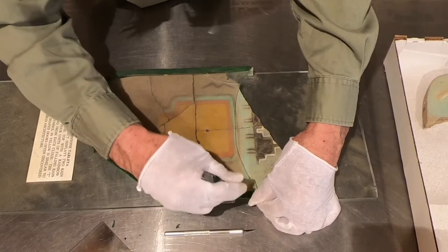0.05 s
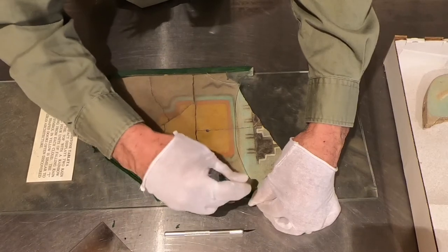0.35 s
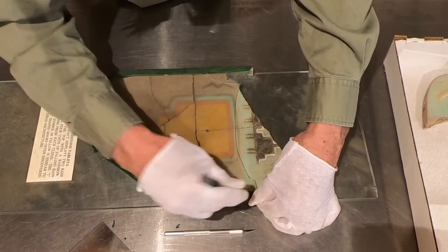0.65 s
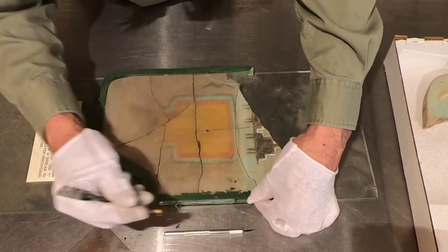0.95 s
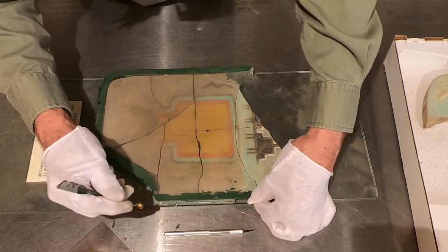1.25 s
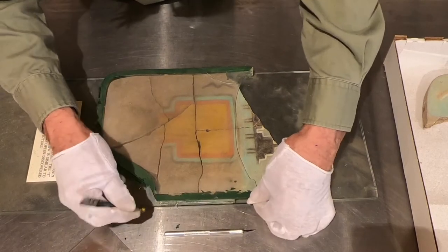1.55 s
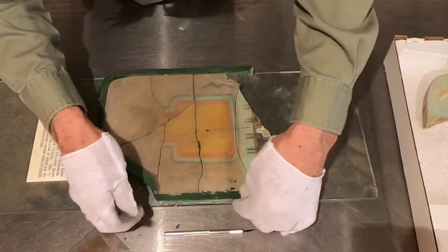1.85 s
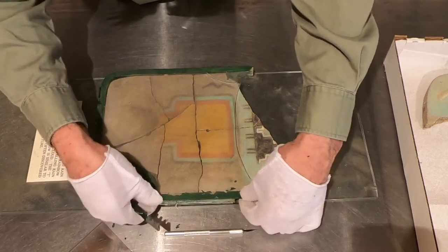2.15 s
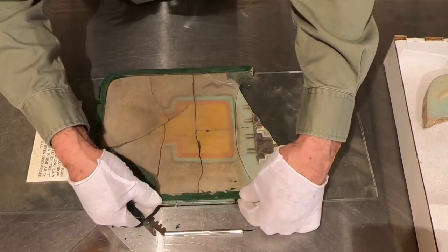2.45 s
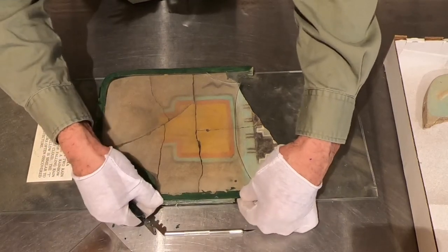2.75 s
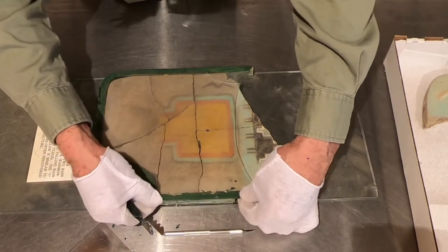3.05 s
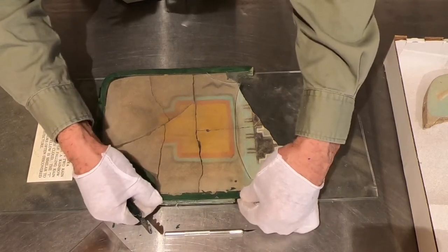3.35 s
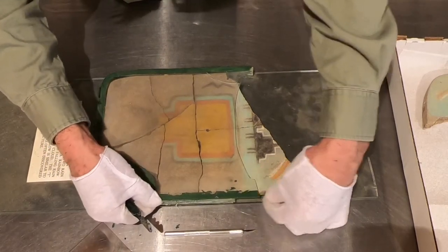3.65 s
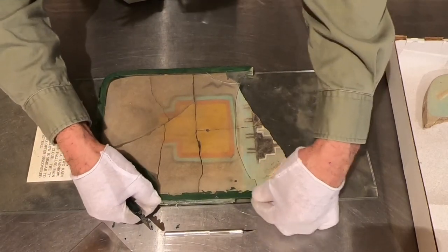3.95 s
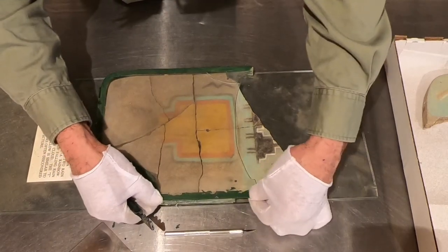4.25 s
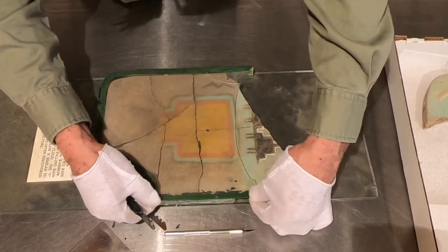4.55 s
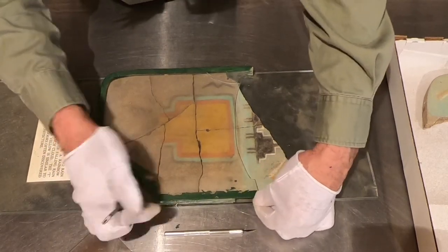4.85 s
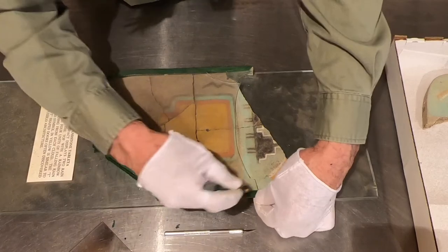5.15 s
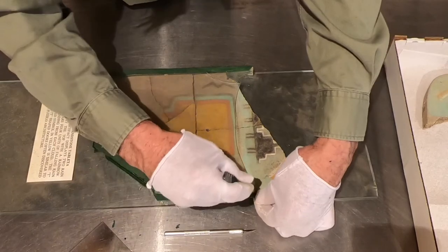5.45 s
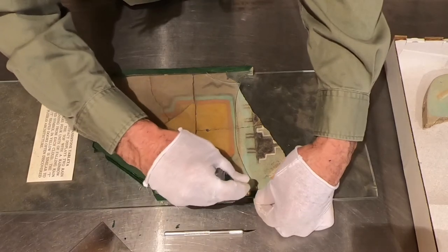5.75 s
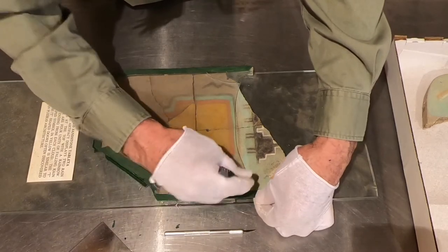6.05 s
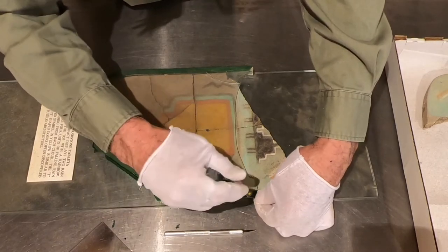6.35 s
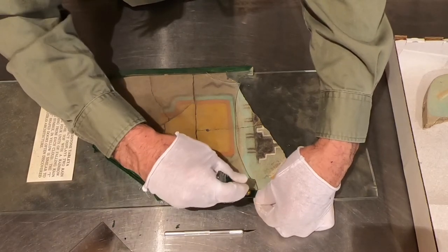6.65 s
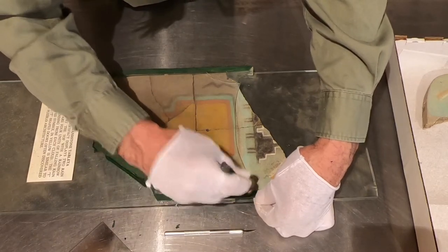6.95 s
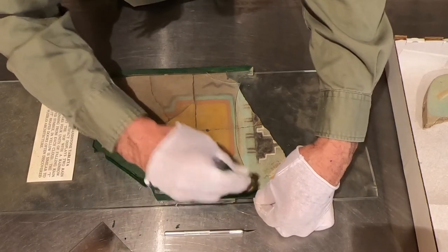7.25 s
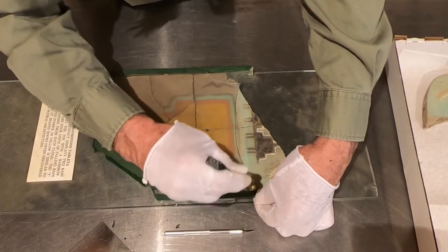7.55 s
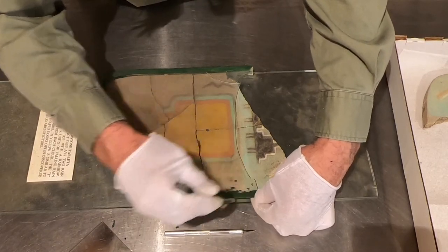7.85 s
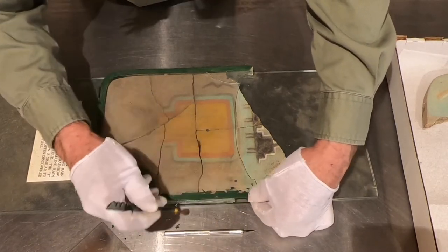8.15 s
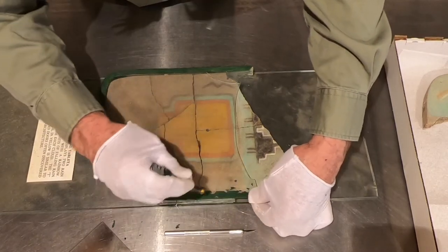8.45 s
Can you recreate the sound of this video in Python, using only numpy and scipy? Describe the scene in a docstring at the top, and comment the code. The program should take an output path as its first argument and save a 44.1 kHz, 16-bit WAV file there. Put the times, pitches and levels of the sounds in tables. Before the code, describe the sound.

Two runs of sharp taps on glass, with light tool scraping and knocking between them, over a faint room hum.

```python
"""In a quiet, hard-walled workroom, a small steel hand tool taps a cracked glass plate on a steel bench.
Each tap is a short glassy crack with a thud, an echo from the walls and a faint, long ring of the bench.
Between two runs of taps the tool scrapes, knocks and slips as a gloved hand shifts it.
Ventilation and mains hum lie underneath, and a limiter turns the hardest taps down."""
import sys
import numpy as np
from scipy import signal
from scipy.fft import rfft, irfft, next_fast_len
from scipy.io import wavfile
from scipy.ndimage import uniform_filter1d, minimum_filter1d

SR = 44100
rng = np.random.default_rng(int(sys.argv[2]) if len(sys.argv) > 2 else 0)


def waveform_to_disk(signal):
    """Save audio, clipped to [-1, 1], as 16-bit WAV at the path in sys.argv[1]."""
    frames = np.transpose(np.atleast_2d(signal))
    scaled = np.clip(frames, -1, 1) * 32767
    samples = np.round(scaled).astype(np.int16)
    wavfile.write(sys.argv[1], SR, samples)


N = 383665


def from_db(db):
    """Turn decibels into a number to multiply a sound by."""
    return 10 ** (np.asarray(db) / 20)


def seconds(length):
    """The time of every sample in a sound this many seconds long."""
    return np.arange(int(length * SR)) / SR


def at_hz(points, hz):
    """Read between the rows of a table, giving every octave equal space."""
    known_hz, values = np.transpose(points)
    return np.interp(np.log(np.maximum(hz, 1)), np.log(known_hz), values)


def keep_only(x, kind, hz, order=2):
    """Keep the "low" or the "high" part of a sound and fade out the rest."""
    return signal.sosfilt(signal.butter(order, hz, kind, fs=SR, output="sos"), x)


def add(out, sound, start_s):
    """Mix a sound in, dropping what falls outside the scene."""
    start = int(round(start_s * SR))
    first, last = np.clip([start, start + sound.shape[-1]], 0, N)
    out[:, first:last] += sound[..., first - start:last - start]


# Sound arriving from all around. Each row: frequency in Hz, how alike left and right are (1 is the same).
LIKENESS = [(100, 0.74), (350, 0.8), (700, 0.4), (1400, 0.2), (2800, .45), (5000, 0.5), (9000, -.1),
            (14000, 0)]
def surrounding_noise(colour, size):
    """The spectrum of stereo noise whose two sides are most alike in the bass."""
    hz = np.fft.rfftfreq(size, 1 / SR)
    mid, side = rfft(rng.standard_normal((2, size)))
    alike = at_hz(LIKENESS, hz)
    pair = np.sqrt((1 + alike) / 2) * mid + np.sqrt((1 - alike) / 2) * side * [[1], [-1]]
    return hz, pair * from_db(at_hz(colour, hz))


def tail(colour, fade_times, size, build_s):
    """Many echoes or tones blur into noise that builds up, then fades at its own speed in each band."""
    hz, noise = surrounding_noise(colour, size)
    t, out = np.arange(size) / SR, 0
    build_up = 1 - np.exp(-(t / build_s) ** 2)
    edges_hz = np.geomspace(25, 16000, 20)
    for low, high in zip(edges_hz, edges_hz[1:]):
        band = irfft(noise * ((hz >= low) & (hz < high)), size)
        envelope = from_db(-60 * t / at_hz(fade_times, np.sqrt(low * high))) * build_up
        out = out + band * envelope / np.linalg.norm(envelope)
    return out


def ring(tones, t, spread_db, rise_cycles):
    """Fading tones, mixed a little differently by every blow; bending waves bring the low ones in last."""
    out = 0
    for hz, db, fade_s in tones:
        level = from_db(db + rng.normal(0, spread_db) - 60 * t / fade_s)
        rise = 1 - np.exp(-(hz * t / rise_cycles) ** 2)
        out = out + level * rise * np.sin(2 * np.pi * hz * t)
    return out


def contact(x, bass_db, treble_db):
    """A heavier contact brings more bass, a harder one more treble."""
    x = x + (from_db(bass_db) - 1) * keep_only(x, "low", hz=600, order=1)
    treble_hz = 4300 if treble_db < 0 else 8600
    return x + (from_db(treble_db) - 1) * keep_only(x, "high", treble_hz, order=1)


# The tones of glass and tool at pitch 1. Each row: frequency in Hz, level in dB, seconds to fade by 60 dB.
GLASS_TONES = [(167, -40.8, 0.0169), (438, -17.9, 0.0547), (633, -21.4, 0.0305), (800, -7.0, 0.0184),
               (1114, -19.3, 0.0083), (1334, -17.9, 0.0107), (1983, -12.2, 0.0202), (2646, -13.3, 0.0105),
               (2831, -3.1, 0.0143), (3697, -4.9, 0.0099), (3985, -7.4, 0.0103), (5052, -10.9, 0.0127),
               (6326, -8.9, 0.0071), (6881, -21.4, 0.0075), (8145, -22.5, 0.0091), (9600, -20.1, 0.0037),
               (13296, -45.7, 0.0029)]
def glass_crack(pitch, bounce_s=.00088):
    """The plate rings, hushed at once by hand and bench; the bench top throws its sound back."""
    t = seconds(.05)
    plate = ring(GLASS_TONES, t * pitch, spread_db=1.2, rise_cycles=.4)
    plate = keep_only(plate, "high", hz=90)
    bounce = np.interp(t - bounce_s, t, plate, left=0)
    mid = from_db(-9) * plate + bounce
    side = from_db(-13) * keep_only(mid, "high", hz=6500)   # left and right differ in the treble
    return mid + side * [[-1], [1]]


# Taps on the glass. Each row: start in seconds, force in dB, bass in dB, treble in dB.
TAPS = [(-.085, 8, -6.5, -6), (.2660, 7.5, -5, -9), (0.5781, 6.5, 0.5, 1.5), (5.3220, -2, -6.5, -3),
        (5.6660, 7, 2, 1.5), (6.0709, 5.5, 3.5, 4.5), (6.678, -19, 3.5, -21.5), (7.0043, 7, 2.5, 2.5),
        (7.3188, 6.5, -1, 1), (8.639, 1.5, -7, 2)]
# The room's echo of a tap. Each row: frequency in Hz, relative level in dB.
ROOM_COLOUR = [(30, -13), (85, -0.5), (120, 8.5), (300, 9.5), (560, 14), (820, 15.5), (1250, 11), (1720, 9),
               (2000, 13.5), (2900, 11.5), (4500, 9), (7800, 3), (10400, -8.5), (11800, -25.5),
               (14500, -28.5)]
# How long that echo lasts. Each row: frequency in Hz, seconds to fade by 60 dB.
ROOM_FADE = [(100, 0.28), (400, 0.35), (1000, .48), (3000, 0.48), (7000, 0.41), (14000, 0.36)]
# The shimmer of the bench's many weak tones. Each row: frequency in Hz, relative level in dB.
SHIMMER_COLOUR = [(100, -28.5), (350, -3.5), (700, 1), (1200, -7), (2200, -11), (4000, -33.5),
                  (9000, -50.5)]
# How long that shimmer lasts. Each row: frequency in Hz, seconds to fade by 60 dB.
SHIMMER_FADE = [(300, 4.9), (1000, 1.9), (2500, 1.1), (8000, 0.67)]
# Plate and bench together, from thud and glassy ring to the long hum of sheet steel.
# Each row: frequency in Hz, relative level in dB, seconds to fade by 60 dB.
BENCH_TONES = [(53, -49, 0.27), (106, -35, 0.099), (128, -33.5, 0.22), (178, -36.5, 0.23),
               (230.9, -36, 0.23), (398.7, -34.5, 0.38), (754, -38, 0.49), (797, -38, 0.46),
               (857, -42, 0.45), (1943, -41.5, 0.3295), (2020, -42.5, 0.62), (2571, -46, .33),
               (2780, -39, .35), (3700, -44.5, 0.32), (370.9, -67, 3.8), (395, -67, 3.5), (442, -67, 1.6),
               (485, -68.5, 1), (548, -67, 2.6), (577, -69.5, 4.9), (614, -66.5, 5.3), (636, -66, 5.5),
               (654, -62.5, 5.8), (734, -69, 2.3), (835, -62, 2.9), (1035, -65.5, 3), (1052, -68, 2.8),
               (1453, -77.5, 3.9), (2131, -68, 1.2)]
def taps(fresh_share=.64, room_db=3.5, bench_db=1):
    """Each tap sounds the glass, shakes the bench and fills the room; echoes change as the tool moves."""
    out, t = np.zeros((2, N)), seconds(3)
    shared_echo = tail(ROOM_COLOUR, ROOM_FADE, size=32768, build_s=.0051)
    for start_s, force_db, bass_db, treble_db in TAPS:
        crack = glass_crack(pitch=.8 if start_s > 8 else 1)   # the tool moves to a lower-sounding spot
        fresh_echo = tail(ROOM_COLOUR, ROOM_FADE, size=32768, build_s=.0048)
        echo = np.sqrt(1 - fresh_share) * shared_echo + np.sqrt(fresh_share) * fresh_echo
        shimmer = tail(SHIMMER_COLOUR, SHIMMER_FADE, size=98304, build_s=.0075)
        bench = ring(BENCH_TONES, t, spread_db=3, rise_cycles=.93)
        for part in (crack, from_db(room_db) * echo, shimmer, from_db(bench_db) * bench):
            add(out, from_db(force_db) * contact(part, bass_db, treble_db), start_s)
    return out


# The rush of air. Each row: frequency in Hz, relative level in dB.
AIR_COLOUR = [(25, -23), (55, -9), (80, -10.5), (130, -1), (180, -3), (260, -3), (340, -7.5), (460, -19.5),
              (800, -9), (1000, -19), (1400, -15), (2400, -26.5), (8000, -35), (15500, -55)]
def ventilation(level_db=-64.5):
    """Moving air makes a soft, steady, low noise."""
    _, spectrum = surrounding_noise(AIR_COLOUR, next_fast_len(N + 2, True))
    air = irfft(spectrum)[:, :N]
    return from_db(level_db) * air / air.std()


# The low tones of the hum. Each row: frequency in Hz, average (rms) level in dB.
HUM_TONES = [(59.3, -80.5), (118.6, -63.5), (178, -83), (236.9, -74), (296.1, -69), (355.3, -81.5)]
# The high tones of the whine. Each row: frequency in Hz, average (rms) level in dB.
WHINE_TONES = [(5739, -97), (8463, -107), (10562, -109)]
def mains_hum():
    """Mains electricity makes a steady hum with a thin whine above it."""
    t = np.arange(N) / SR
    return sum(np.sqrt(2) * from_db(db) * np.sin(2 * np.pi * (hz * t + rng.random()))
               for hz, db in [*HUM_TONES, *WHINE_TONES])


# Steel sliding on glass. Each row: frequency in Hz, relative level in dB.
RUB_COLOUR = [(50, 4), (150, 5), (400, 12.5), (800, 14.5), (1500, 13.5), (3200, 11.5), (5000, 7),
              (7300, 7.5), (9000, -1.5), (10700, -5), (12000, -15), (15000, -20)]
def rub(echo, length_s, bass_db, treble_db, attack_s=.0055, direct_db=-5):
    """A spray of tiny contacts swells and fades; each one ticks on the spot and echoes in the room."""
    t = seconds(.15)
    envelope = (1 - np.exp(-t / attack_s)) * np.exp(-(t / length_s) ** 2)
    grains = rng.standard_normal(len(t)) * envelope
    grains *= from_db(6 * rng.standard_normal(len(t)))   # some catch harder than others
    grains /= np.linalg.norm(grains)
    tick = tail(RUB_COLOUR, fade_times=[(100, .01), (10000, .026)], size=24576, build_s=.0013)
    rubbing = signal.fftconvolve(echo + from_db(direct_db) * tick, grains[None], axes=1)
    return contact(rubbing, bass_db, treble_db)


# Drags of the tool. Each row: start in seconds, level in dB, length in seconds, bass in dB.
SCRAPES = [(1.357, -49.5, 0.022, -6), (1.711, -39, .023, 13), (1.919, -27.5, 0.039, 12),
           (2.207, -34, 0.072, -14), (2.681, -14, 0.058, -1), (2.888, -30.5, 0.019, 10),
           (2.969, -29, 0.01, -17), (3.164, -38.5, 0.061, -5), (3.345, -42, 0.012, 18.5),
           (3.423, -33.5, 0.0071, -5), (4.841, -43.5, .05, 16), (8.124, -47, 0.023, 21)]
def scrapes(echo):
    """The tool is dragged a little way over glass and steel; a heavier drag has more bass."""
    out = np.zeros((2, N))
    for start_s, db, length_s, bass_db in SCRAPES:
        add(out, from_db(db) * rub(echo, length_s, bass_db, treble_db=7), start_s)
    return out


# Light knocks of the tool. Each row: start in seconds, level in dB, bass in dB, treble in dB.
KNOCKS = [(1.846, -43.5, 11, -9), (2.332, -30, -27, 9.5), (4.534, -19.5, 14, 8.5), (4.707, -37.5, -10, -17),
          (7.849, -47, 21, -22)]
def knocks(echo, knock_s=.0002, skid_s=.0061, skid_after_s=.014, skid_db=-4.5):
    """The tool knocks once as it is put down or turned, then its tip skids on more softly."""
    out = np.zeros((2, N))
    for start_s, db, bass_db, treble_db in KNOCKS:
        knock = rub(echo, knock_s, bass_db, treble_db, attack_s=knock_s, direct_db=-.5)
        add(out, from_db(db) * knock, start_s)
        skid = rub(echo, skid_s, bass_db, treble_db)
        add(out, from_db(db + skid_db) * skid, start_s + skid_after_s)
    return out


def slips(echo, from_s=3.5, until_s=5.1, per_second=2.8, level_db=-43, spread_db=1.5):
    """The tool slips in the glove as the grip shifts: faint, thin scrapes at uneven times."""
    out = np.zeros((2, N))
    starts = np.arange(from_s, until_s, 1 / per_second)
    for start_s, (late, louder) in zip(starts, rng.uniform(-1, 1, (len(starts), 2))):
        slip = rub(echo, length_s=.044, bass_db=0, treble_db=11.5, attack_s=.022)
        add(out, from_db(level_db + spread_db * louder) * slip, start_s + .5 * late / per_second)
    return out


# How long the echo of the handled tool lasts. Each row: frequency in Hz, seconds to fade by 60 dB.
RUB_FADE = [(200, 0.56), (2000, 0.39), (7000, 0.38), (14000, 0.36)]
def handling():
    """Scrapes, knocks and slips all share one echo from the walls."""
    echo = tail(RUB_COLOUR, RUB_FADE, size=24576, build_s=.0051)
    return scrapes(echo) + knocks(echo) + slips(echo)


def scene():
    """Taps and the handled tool over the quiet sounds of the room."""
    return taps() + ventilation() + mains_hum() + handling()


def limiter(x, ceiling_db=-.4, release_db_per_s=65):
    """The volume drops just before a loud peak and creeps back, holding up the start of the echo."""
    peak_db = 20 * np.log10(np.abs(x).max(axis=0) + 1e-9)
    over_db = np.maximum(peak_db - ceiling_db, 0)
    recovery_db = release_db_per_s * np.arange(N) / SR
    gain_db = recovery_db - np.maximum.accumulate(over_db + recovery_db)
    early_gain_db = minimum_filter1d(gain_db, size=133)
    return x * from_db(uniform_filter1d(early_gain_db, size=67))


def record(dry, cutoff_hz=15700):
    """Turn down the loudest peaks, then cut off the very highest treble."""
    top_cut = signal.ellip(10, .1, 80, cutoff_hz, fs=SR, output="sos")
    return signal.sosfilt(top_cut, limiter(dry))


dry = scene()
out = record(dry)
waveform_to_disk(out)
```